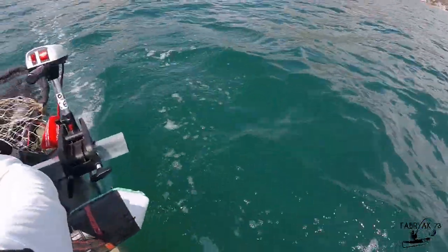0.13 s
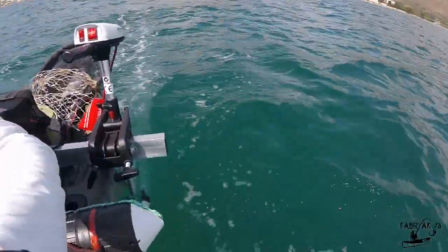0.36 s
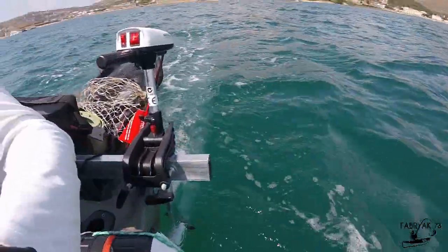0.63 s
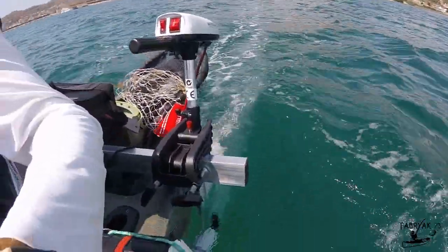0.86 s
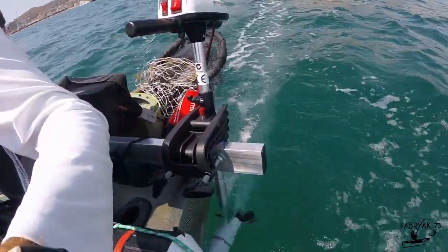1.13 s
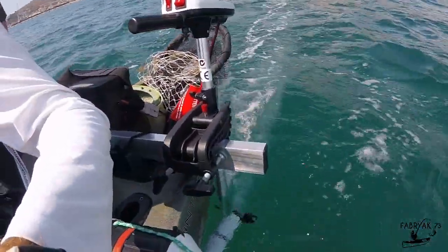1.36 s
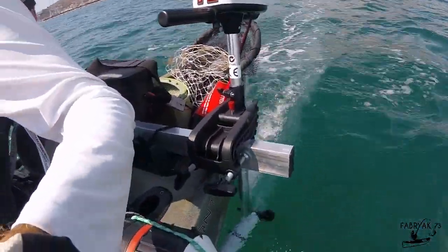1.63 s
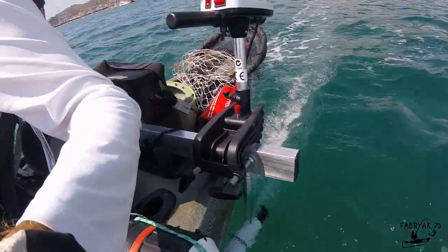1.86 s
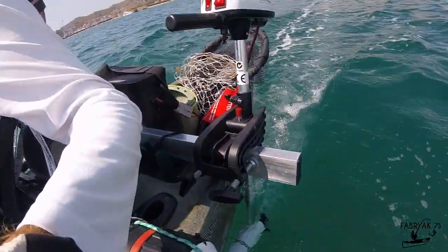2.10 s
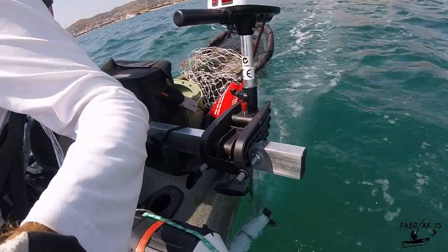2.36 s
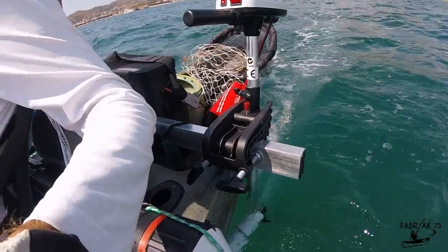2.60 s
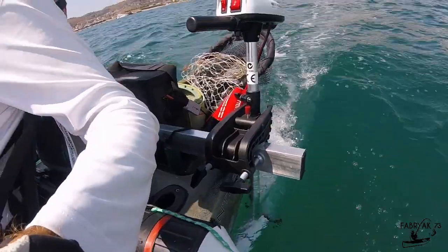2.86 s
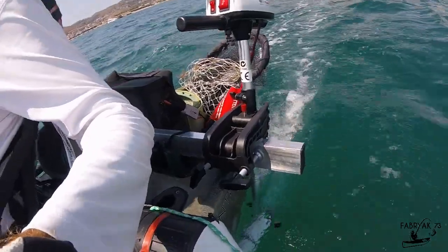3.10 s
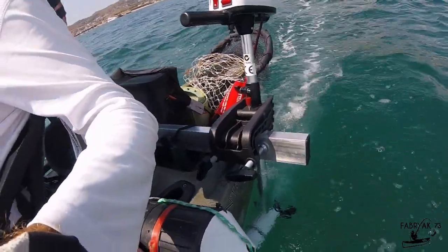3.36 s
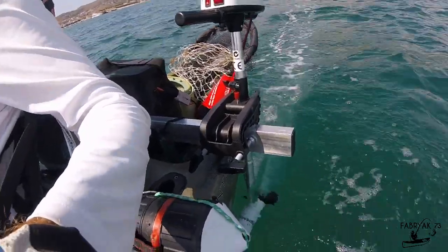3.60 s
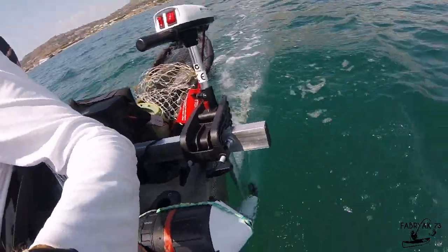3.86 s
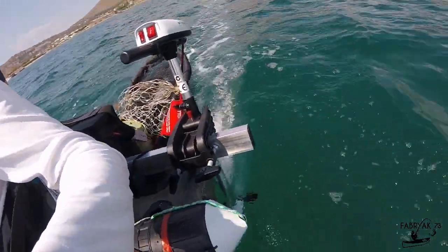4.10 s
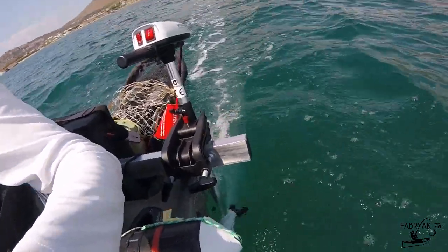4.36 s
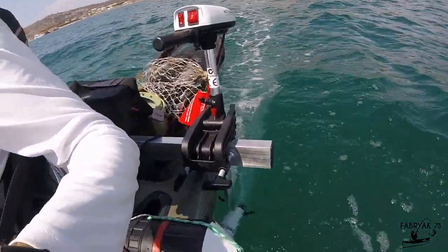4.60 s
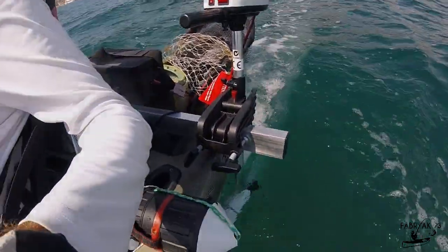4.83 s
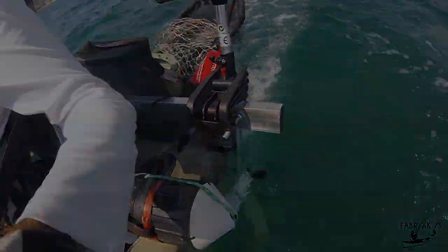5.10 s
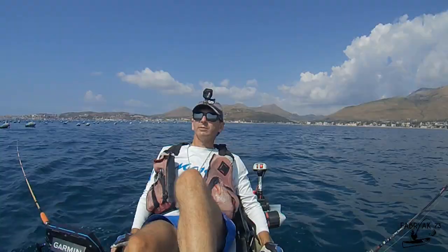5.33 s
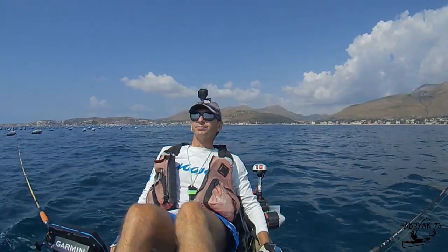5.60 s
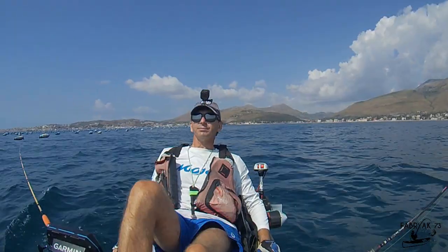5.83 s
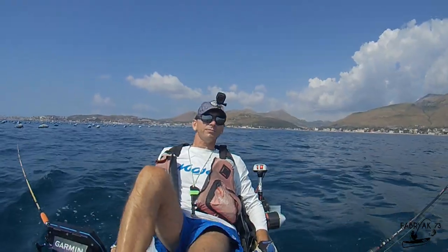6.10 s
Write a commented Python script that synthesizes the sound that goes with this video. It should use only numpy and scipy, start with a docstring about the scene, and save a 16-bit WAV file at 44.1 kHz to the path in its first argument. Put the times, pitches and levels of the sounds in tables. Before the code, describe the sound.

Heavy wind gusts buffet the microphone over a small boat's fluttering propeller thump, bubbling, hissing wake and hull slaps, then a hard cut to faint calm wind.

```python
"""A propeller thumps about 62 times a second behind a small boat, with wind gusts, hissing wake and bubbles.
Each beat rings a pocket of air that the waves squeeze, and some beats slap; a steady hum lies beneath.
Shaped noise makes the wind and the wash; short damped tones make the bubbles, knocks and slaps.
The stern then cuts off hard, and after a short silence a faint, calm wind is heard from another seat."""
import sys
import numpy as np
from scipy import signal
from scipy.fft import rfft, irfft, next_fast_len
from scipy.io import wavfile
from scipy.ndimage import uniform_filter1d, map_coordinates

SR = 44100
rng = np.random.default_rng(int(sys.argv[2]) if len(sys.argv) > 2 else 0)


def to_wav(sig):
    """Store sig (one row per channel, or 1-D mono) as 16-bit WAV at the path in sys.argv[1].

    Samples outside -1..1 are clipped; the rate is SR.
    """
    pcm = np.clip(np.atleast_2d(sig), -1, 1) * 32767
    pcm = np.round(pcm).astype(np.int16)
    wavfile.write(sys.argv[1], SR, pcm.T)  # frames by channels


def volts(x):
    """Linear amplitude factor 10**(x/20) for a level x in dB, scalar or array-like."""
    e = np.asarray(x, float) / 20
    return 10 ** e


N = 273861  # length in samples

# All levels are those ahead of the finishing in record().
# Light air after the cut. Each row: time in seconds, rush level in dB.
CALM_RUSH = [(5.76, -58), (5.951, -54), (6.21, -51)]
# Tone of that rush. Each row: frequency in Hz, relative level in dB.
RUSH_TONE = [(60, -20), (150, -2.5), (500, -13.5), (700, -30), (1300, -33), (2500, -43.5), (5000, -54),
             (12000, -66)]
# Tone of the calm rumble. Each row: frequency in Hz, relative level in dB.
CALM_RUMBLE_TONE = [(15, -22.0), (40, -1), (90, -16.0), (160, -14), (220, -16), (300, -74.0)]
# Two puffs on the microphone port. Each row: start in seconds, level in dB, settled pitch in Hz.
PORT_PUFFS = [(5.906, -19.5, 80), (6.035, -26.5, 60.3)]
# Gusts at the stern. Each row: time in seconds, rumble level in dB, flutter level in dB.
GUSTS = [(0.0, -18, -22.5), (0.35, -25, -18), (0.4, -9.5, -19), (0.52, -13.5, -15), (0.6, -19, -20.5),
         (0.7, -18, -17), (0.79, -18, -15), (0.84, -12.5, -16), (1.12, -16, -15), (1.22, -23, -27),
         (1.33, -17.5, -26.5), (1.49, -25, -33), (1.73, -9, -15.5), (1.74, -20, -29), (1.88, -14.5, -13.5),
         (2.0, -31.5, -19.5), (2.09, -10, -15), (2.14, -26, -13.5), (2.2, -11, -29.5), (2.25, -19, -11.5),
         (2.3, -11.5, -20), (2.76, -17.5, -20), (2.9, -15.5, -17.5), (2.95, -14.5, -19), (3.53, -22.5, -21),
         (3.64, -14.5, -14.5), (3.72, -15, -21.5), (3.85, -20.5, -26), (3.95, -15.5, -18.5),
         (4.22, -16.5, -15.5), (4.25, -21, -20), (4.61, -15, -13.5), (4.67, -23, -44), (4.74, -11, -21),
         (4.9, -15.5, -19), (5.3, -13, -18), (5.63, -18.5, -13), (5.69, -12, -16)]
# Tone of the low wind. Each row: frequency in Hz, relative level in dB.
RUMBLE_TONE = [(10, -21), (20, 3.5), (45, 2.5), (70, -7), (120, -29.5), (300, -101)]
# Tone of the rougher wind. Each row: frequency in Hz, relative level in dB.
FLUTTER_TONE = [(35, -39.5), (60, 3.5), (90, -0.5), (150, -6), (350, -18), (800, -44), (2000, -75)]
# Churned water. Each row: time in seconds, gurgle level in dB ahead of GURGLE_LIFT_DB, fizz level in dB.
WAKE_LEVELS = [(0.0, -59, -57), (0.21, -43.5, -46.5), (0.44, -35.5, -43), (0.89, -42, -47),
               (1.59, -37.5, -45), (2.04, -42.5, -46), (2.53, -37.5, -46), (3.26, -38.5, -46.5),
               (3.57, -38.5, -46), (3.72, -33.5, -41), (3.92, -33, -37), (4.06, -36, -39),
               (4.26, -39.5, -48), (4.46, -38, -44), (4.72, -37, -43), (4.92, -35.5, -43),
               (5.18, -42.5, -46.5), (5.5, -37, -45.5)]
# Tone of the low wash. Each row: frequency in Hz, relative level in dB.
GURGLE_TONE = [(150, -36.5), (400, -1), (900, -9), (1250, -7.5), (1700, -8), (2500, -15.5), (4000, -27),
               (8000, -78)]
# Tone of the hiss. Each row: frequency in Hz, relative level in dB.
FIZZ_TONE = [(1200, -34), (2600, -4), (3900, -8.5), (4900, 1), (6500, -7.5), (9500, -12), (11500, -24),
             (14500, -41.5), (15400, -70)]
# Water thrown against the hull. Each row: start in seconds, length in seconds, level in dB.
SLOSHES = [(.95, 0.0098, -39), (1.03, 0.017, -41.5), (1.73, 0.039, -40), (2.965, 0.03, -35),
           (3.61, 0.014, -31), (4.76, 0.043, -46), (5.41, 0.022, -40)]
# Spells of dense bubbling. Each row: start in seconds, length in seconds, level in dB.
FROTH_SPELLS = [(.42, 0.056, -43), (.57, 0.3, -43.5), (1.03, .04, -43), (1.17, 0.14, -43),
                (1.76, 0.071, -38), (2.0, .1, -42), (2.34, 0.39, -40), (3.3, .28, -54), (3.6, 0.059, -32),
                (3.76, 0.48, -36.5), (4.3, 0.27, -48), (4.78, 0.31, -39.5)]
# Spray cracking on the hull. Each row: time in seconds, relative level in dB.
SPRAY_CRACKS = [(0.9422, -31), (1.3654, -32), (1.7135, -34), (1.7344, -29), (1.7492, -28), (1.774, -33),
                (1.7984, -28), (1.836, -29), (2.2157, -31), (2.4169, -28.5), (2.6477, -31), (2.963, -28.5),
                (3.342, -31.5), (3.3988, -31), (3.5951, -31.5), (4.1499, -31), (4.6096, -30), (5.6485, -32)]
# Tone of a crack. Each row: frequency in Hz, relative level in dB.
CRACK_TONE = [(1500, -32.5), (3000, -7), (5000, 8), (9000, -3.5), (11500, -21), (14500, -42), (15400, -55)]
# Single bubbles. Each row: start in seconds, level in dB, settled pitch in Hz, 60 dB decay in seconds.
SINGLE_BUBBLES = [(0.624, -9, 2200, 0.0052), (.641, -21.5, 1000, 0.033), (.826, -27, 1150, .025),
                  (0.944, -24, 1050, .025), (.897, -14.5, 3070, 0.0065), (1.001, -17, 1640, 0.014),
                  (1.141, -10, 5160, 0.005), (1.226, -17.5, 1840, 0.011), (1.2735, -16.5, 1680, 0.019),
                  (1.369, -19, 1680, 0.019), (1.4015, -5.5, 692, 0.038), (1.541, -16, 677, .035),
                  (1.633, -18.5, 4600, 0.0078), (2.081, -26, 1490, 0.01), (2.378, -16, 2820, 0.011),
                  (2.392, -22, 1930, 0.026), (2.544, -22.5, 2660, 0.02), (2.781, -25, 1050, 0.025),
                  (2.974, -17, 1630, .012), (3.248, -18.5, 1045, 0.03), (3.415, -14.5, 1400, 0.017),
                  (3.448, -17.5, 1260, 0.017), (3.543, -21, 1500, 0.016), (3.59, -33, 1200, 0.02),
                  (3.598, -23, 5100, 0.01), (3.676, -20, 1500, 0.027), (3.836, -22, 4050, 0.014),
                  (4.014, -17, 3230, 0.0075), (4.046, -16, 880, 0.029), (4.299, -24, 1220, 0.035),
                  (4.394, -20.5, 1030, 0.025), (4.908, -21.5, 2150, 0.024), (5.075, -19, 1080, 0.023),
                  (5.602, -9, 1730, 0.012), (5.617, -9.5, 1740, 0.016)]
# Steady drive through the bracket. Each row: multiple of the beat, central level in dB.
HUM_PARTIALS = [(2, -31.5), (3, -31.5), (4, -32), (5, -36.5), (6, -40), (7, -47), (8, -51)]
# Propeller beat, rising and falling with the swell. Each row: time in seconds, nominal rate in Hz.
BEAT_RATE = [(0.0, 62.59), (0.3, 62.53), (0.65, 64.23), (1.0, 63.44), (1.3, 62.86), (1.6, 63.5),
             (1.9, 61.98), (2.3, 61.8), (2.6, 62.21), (2.85, 65.03), (3.1, 62.05), (3.45, 60.82),
             (3.75, 62.83), (4.0, 66.07), (4.25, 61.68), (4.6, 63.81), (4.9, 64.04), (5.2, 60.58),
             (5.69, 61.38)]
# Beats where a blade slaps air. Each row: time in seconds, relative level in dB, pitch in Hz before scaling.
BLADE_SLAPS = [(0.231, -16.5, 390), (0.265, -15, 383), (0.28, -11, 305), (0.328, -8, 420),
               (0.345, -8.5, 320), (0.377, -10.5, 315), (0.425, -12, 318), (.958, -19, 400),
               (1.052, -24, 485), (1.177, -14, 397), (1.193, -7.5, 430), (1.208, -6.5, 317),
               (1.227, -10, 325), (1.258, -11.5, 338), (1.275, -9, 308), (1.291, -14, 320),
               (1.525, -14, 484), (2.182, -13.5, 290), (2.232, -13.5, 427), (2.345, -18, 310),
               (2.361, -18, 487), (2.426, -11, 332), (2.479, -23, 423), (2.585, -15, 304),
               (2.619, -9.5, 455), (2.635, -12.5, 310), (2.65, -13, 323), (2.681, -13, 420),
               (2.697, -12, 497), (2.728, -12.5, 514), (2.852, -20.5, 430), (2.945, -19, 405),
               (3.399, -14, 307), (3.446, -23, 424), (3.529, -13, 324), (3.564, -14, 330), (3.61, -14, 300),
               (3.643, -7.5, 493), (4.229, -13.5, 275), (4.316, -15, 366), (4.445, -18, 380),
               (4.478, -7.5, 336), (4.51, -13, 520), (4.525, -11, 423), (4.59, -13, 413),
               (4.636, -12.5, 328), (4.683, -14.5, 440), (4.699, -11.5, 405), (4.75, -14.5, 380),
               (4.822, -15, 465), (5.369, -19, 493), (5.42, -11, 423), (5.486, -14.5, 320), (5.5, -12, 400),
               (5.554, -21, 364), (5.568, -9, 283), (5.602, -9.5, 290), (5.649, -17.5, 324)]
# Air pocket squeezed by each wave. Each row: time in seconds, nominal pitch in Hz.
POCKET_PITCH = [(0, 135), (.3, 302), (.55, 172), (.8, 257), (1.05, 198.6), (1.14, 203), (1.26, 275),
                (1.4, 256), (1.55, 237), (1.62, 128), (1.75, 132.6), (1.9, 135.7), (2.07, 187), (2.25, 282),
                (2.43, 235), (2.64, 285), (2.78, 241), (2.92, 182), (2.99, 129.3), (3.18, 127), (3.26, 274),
                (3.42, 185), (3.55, 190), (3.63, 326), (3.8, 184), (3.95, 253), (4.08, 199), (4.14, 127),
                (4.27, 128), (4.34, 240), (4.58, 290), (4.7, 250), (4.95, 242), (5.1, 196.4), (5.25, 246),
                (5.6, 319), (5.69, 248)]
# Spells when the pocket rings loud. Each row: start in seconds, length in seconds, relative level in dB.
LOUD_RINGING = [(.24, 0.17, -19), (.6, 0.086, -28), (.78, 0.061, -28), (1.0, 0.13, -12.5),
                (1.19, 0.11, -15), (1.38, 0.15, -17.5), (1.6, 0.13, -23), (1.78, 0.26, -19),
                (2.02, 0.045, -14), (2.2, 0.034, -12.5), (2.345, 0.081, -13), (2.6, 0.15, -12.5),
                (2.89, 0.028, -20.5), (2.98, 0.25, -24), (3.22, 0.099, -17), (3.36, 0.16, -15),
                (3.6, 0.087, -12.5), (3.88, 0.067, -22.5), (4.12, 0.1, -24.5), (4.3, 0.1, -19),
                (4.45, 0.18, -18), (4.68, 0.24, -20), (5.18, 0.11, -23.5), (5.52, 0.16, -15.5)]
# The blade draws air and knocks. Each row: start in seconds, length in seconds, relative level in dB.
AIR_GULPS = [(.23, 0.19, -22), (.78, 0.07, -30), (.96, 0.11, -30), (1.16, 0.18, -17.5), (1.39, 0.042, -19),
             (1.5, 0.048, -20), (2.18, 0.034, -15.5), (2.33, 0.095, -17), (2.41, 0.11, -13),
             (2.6, 0.17, -19.5), (3.05, 0.03, -17), (3.27, 0.029, -26), (3.4, 0.088, -19.5),
             (3.49, 0.077, -14), (3.6, 0.095, -16), (4.22, 0.016, -20), (4.31, 0.018, -20),
             (4.43, 0.11, -14.5), (4.58, 0.16, -18), (4.75, 0.076, -21.5), (5.04, 0.048, -22),
             (5.41, 0.078, -15), (5.48, 0.23, -20)]

CUT_S, RETURN_S = 5.697, 5.762  # the stern stops; the calm seat starts
CALM_RUMBLE_DB = -50
GUSTY_DB, GUSTS_PER_S = 2, 10  # quick changes on top of the gusts
GURGLE_LIFT_DB, CHOP_DB = 4, 0.5  # lift of the gurgle; depth of small waves
RING_REST_DB, KNOCK_REST_DB = -38.5, -40  # relative levels between spells
SWELL_S, FADE_S = 0.024, 0.044  # rise and fall of a ringing spell


def unit(x):
    """Scale to rms 1."""
    return x / np.sqrt(np.mean(x ** 2) + 1e-20)


def curves(rows):
    """Draw one value per sample for each column after the time."""
    s, *cols = np.transpose(rows)
    return [np.interp(np.arange(N) / SR, s, c) for c in cols]


def wobble(rate):
    """Draw a smooth random curve with rate knots a second."""
    knots = rng.standard_normal(int(N * rate / SR) + 4)
    return map_coordinates(knots, [np.arange(N) * rate / SR])


def colour(x, spectrum):
    """Filter x through a spectrum in Hz and dB, then scale to rms 1."""
    m = next_fast_len(N + 8192)
    hz, db = np.transpose(spectrum)
    bins = np.fft.rfftfreq(m, 1 / SR)
    gain = volts(np.interp(np.log(bins + 1), np.log(hz + 1), db))
    return unit(irfft(rfft(x, m) * gain, m)[:N])


def patchy(patchy_db, size=512):
    """White noise with blotches of random gain in time and frequency."""
    z = signal.stft(rng.standard_normal(N), nperseg=size)[2]
    field = uniform_filter1d(rng.standard_normal(z.shape), size=5, axis=0)
    field = uniform_filter1d(field, size=3, axis=1)
    return signal.istft(z * volts(patchy_db * unit(field)), nperseg=size)[1][:N]


def rings(s, gain, hz, t60, glide, attack, count):
    """Damped tones, count samples each; the pitch starts at (1 + glide) times hz and settles."""
    t, hz, t60 = np.arange(count) / SR, hz[:, None], t60[:, None]
    settle = t60 / 4
    phase = 2 * np.pi * hz * (t + glide * settle * (1 - np.exp(-t / settle)))
    envelope = volts(-60 * t / t60) * (1 - np.exp(-t / attack))
    tone = gain[:, None] * np.sin(phase) * envelope
    at = np.round(s * SR).astype(int)[:, None] + np.arange(count)
    return np.bincount(at.ravel(), tone.ravel(), N + count + SR)[:N]


def grains(count, hz, spread, turns, size_db, glide, attack, size):
    """Random bubbles or droplets at rms 1: log-normal pitch, decay of turns cycles, rarely large."""
    u, g = rng.random((count, 2)), rng.standard_normal(count)
    pitch = np.clip(hz * np.exp(spread * g), 250, 14000)
    gain = volts(-size_db * np.log(u[:, 1] + .03))
    return unit(rings(u[:, 0] * N / SR, gain, pitch, turns / pitch, glide, attack, count=size))


def puffs(count, life, size_db):
    """Gain that jumps for a few ms each time a crest bursts."""
    u = rng.random((count, 2))
    hits = np.bincount((u[:, 0] * N).astype(int), volts(-size_db * np.log(u[:, 1] + .06)), N)
    t = np.arange(2000) / SR
    return signal.fftconvolve(hits, t / life * np.exp(1 - t / life))[:N]


def spells(rows, rest_db, rise, fall):
    """Level in dB: a resting level, and swells that rise, hold and fade."""
    s, length, db = np.transpose(rows)[:, :, None]
    t = np.arange(0, N, 64) / SR
    before, after = np.maximum(s - t, 0), np.maximum(t - s - length, 0)
    shape = np.exp(-(before / rise) ** 2 - (after / fall) ** 2)
    level = volts(rest_db) + np.max(volts(db) * shape, axis=0)
    return np.interp(np.arange(N) / SR, t, 20 * np.log10(level))


def turning():
    """Count beats since the start, nudged so each slap falls near a whole beat."""
    turns = np.cumsum(curves(BEAT_RATE)[0]) / SR
    at = np.round(np.transpose(BLADE_SLAPS)[0] * SR).astype(int)
    offset = np.unwrap(2 * np.pi * turns[at] % (2 * np.pi)) / (2 * np.pi)
    slip = np.interp(np.arange(N), at, offset)
    return turns - uniform_filter1d(slip, size=5000)


def calm_wind():
    """Light air on a sheltered microphone: low rumble, soft rush and damped puffs."""
    rush_db, = curves(CALM_RUSH)
    rumble = colour(rng.standard_normal(N), CALM_RUMBLE_TONE)
    rush = colour(volts(.7 * wobble(25)) * patchy(1), RUSH_TONE)
    s, db, hz = np.transpose(PORT_PUFFS)
    bumps = rings(s, volts(db), hz, 4.2 / hz, -.1, 0.0051, count=4000)
    return volts(CALM_RUMBLE_DB + 3.2 * wobble(20)) * rumble + volts(rush_db) * rush + bumps


def wind():
    """Eddies on the microphone port: a rumble of like-sized lumps and a rougher flutter."""
    rumble_db, flutter_db = (db + GUSTY_DB * wobble(GUSTS_PER_S) for db in curves(GUSTS))
    rumble = colour(rng.standard_normal(N), RUMBLE_TONE)
    flutter = colour(volts(4.1 * wobble(30)) * rng.standard_normal(N), FLUTTER_TONE)
    # Even out the lumps over about 50 ms.
    rumble = unit(rumble / (uniform_filter1d(rumble ** 2, size=2200) + 0.09) ** 0.39)
    flutter = unit(flutter / (uniform_filter1d(flutter ** 2, size=2200) + 0.095) ** 0.29)
    return volts(rumble_db) * rumble + volts(flutter_db) * flutter


def wake():
    """Churned water: noise and bubbles below, fizz and droplets above, surging together."""
    gurgle_db, fizz_db = (db + CHOP_DB * wobble(12) for db in curves(WAKE_LEVELS))
    thrown = volts(spells(SLOSHES, -55.5, 0.0048, 0.011))
    surge = volts(1.3 * wobble(20)) * (1.5 + 0.66 * puffs(count=450, life=0.0015, size_db=1.5))
    bubbles = grains(count=1800, hz=1400, spread=0.583, turns=19.7, size_db=2,
                     glide=-0.19, attack=0.001, size=1200)
    drops = grains(count=7000, hz=5000, spread=.5, turns=11, size_db=3,
                   glide=-.2, attack=.0003, size=400)
    gurgle = unit(colour(surge * patchy(1.3), GURGLE_TONE) + 0.6 * surge * bubbles)
    fizz = colour(surge * (patchy(2.4) + 0.64 * drops), FIZZ_TONE)
    gurgle_gain = volts(gurgle_db + GURGLE_LIFT_DB) + thrown
    return gurgle_gain * gurgle + (volts(fizz_db) + 0.062 * thrown) * fizz


def froth():
    """Clouds of larger bubbles whose pitch rises as each one rings."""
    cloud = grains(count=1400, hz=1050, spread=.35, turns=22.8, size_db=1.0,
                   glide=-0.22, attack=0.0026, size=1500)
    return volts(spells(FROTH_SPELLS, -50.5, 0.02, 0.066) + 2.9 * wobble(10)) * cloud


def spray():
    """The clearest cracks of spray: bell-shaped noise bursts about 3 ms wide."""
    s, db = np.transpose(SPRAY_CRACKS)
    t = np.arange(500) / SR
    shape = np.exp(-((t - .003) / 0.0016) ** 2)
    burst = volts(db[:, None] + 1.5) * shape * rng.standard_normal((len(s), len(t)))
    at = np.round((s - .002) * SR).astype(int)[:, None] + np.arange(len(t))
    cracks = np.bincount(at.ravel(), burst.ravel(), N)
    return volts(-6.0) * np.std(cracks) * colour(cracks, CRACK_TONE)


def single_bubbles():
    """The clearest bubbles: damped tones whose pitch barely rises."""
    s, db, hz, t60 = np.transpose(SINGLE_BUBBLES)
    return rings(s, volts(db), hz, t60, -.04, .0007, count=2000)


def hum():
    """Multiples of the beat carried by the hull, each wavering on its own."""
    phase = 2 * np.pi * turning()
    partials = (volts(db + 2.54 * wobble(4.6)) * np.sin(round(k) * phase + .5 * wobble(3.325))
                for k, db in HUM_PARTIALS)
    return sum(partials)


def slaps():
    """The hardest beats: a blade slaps air, a short knock falling in pitch."""
    s, db, hz = np.transpose(BLADE_SLAPS)
    return rings(s + 0.001, volts(db + 14.0), 0.763 * hz, 5.97 / hz, 1.394, 0.0033, count=2000)


def propeller():
    """Each beat rings two modes of the air pocket and, unless it slaps, adds an uneven falling knock."""
    beat = np.flatnonzero(np.diff(np.floor(turning())))
    slap_s = np.transpose(BLADE_SLAPS)[0]
    slapped = np.abs(beat[:, None] / SR - slap_s).min(axis=1) < .006
    pocket_hz, = curves(POCKET_PITCH)
    ring_db = spells(LOUD_RINGING, RING_REST_DB, SWELL_S, FADE_S)
    knock_db = spells(AIR_GULPS, KNOCK_REST_DB, 0.019, 0.023) + 2 * wobble(14)
    g = rng.standard_normal((len(beat), 5))  # unevenness of each beat
    s, hz = np.abs(beat / SR + 0.00026 * g[:, 0]), pocket_hz[beat]

    lower_gain = volts(ring_db[beat] + 5.5 + 2.73 * g[:, 1])
    lower = rings(s, lower_gain, hz * np.exp(0.019 * g[:, 2]), 13 / hz, 0.077, 0.00074, count=4000)
    upper_hz = hz + 120
    upper_gain = volts(ring_db[beat] - 1.5 + 5.2 * g[:, 2])
    upper = rings(s, upper_gain, upper_hz, 12 / upper_hz, 0.086, 0.0042, count=4000)

    knock_hz = (0.882 * hz + 140) * np.exp(0.2 * np.tanh(g[:, 4]))
    knock_gain = ~slapped * volts(knock_db[beat] + 8.5 + 1.6 * np.tanh(g[:, 3]))
    knock = rings(s, knock_gain, knock_hz, 7 / knock_hz, 0.89, 0.006, count=2000)
    # Hard knocking sheds big bubbles.
    glugs = grains(count=900, hz=560, spread=0.388, turns=17.6, size_db=2.5,
                   glide=-0.25, attack=0.006, size=3000)
    return lower + upper + knock + volts(knock_db - 9.5) * glugs


def scene():
    """The stern, a cut, then the calm seat fading in."""
    t = np.arange(N) / SR
    water = wake() + froth() + spray() + single_bubbles()
    stern = wind() + water + hum() + slaps() + propeller()
    stern = signal.sosfilt(signal.butter(1, 12, "high", fs=SR, output="sos"), stern)
    cut = np.clip((CUT_S - t) * 1000, 0, 1)  # 1 ms fade
    calm = calm_wind() * np.clip((t - RETURN_S) / 0.017, 0, 1)
    return (stern * cut + calm)[None]


def low_pass(x):
    """Removes everything above the highest recorded frequency."""
    return signal.sosfilt(signal.butter(12, 15200, fs=SR, output="sos"), x)


def record(dry):
    """Gain control rides the gusts down, then the sharpest peaks are softly clipped."""
    level = np.sqrt(np.abs(uniform_filter1d(dry ** 2, size=1800, axis=1)))  # over about 41 ms
    x = dry / (1 + (level / volts(-7.0)) ** 2) ** 0.17 * volts(0.5)
    x = x / (1 + np.abs(x / .92) ** 6) ** (1 / 6)
    return low_pass(x)


dry = scene()
out = record(dry)
to_wav(out)
```